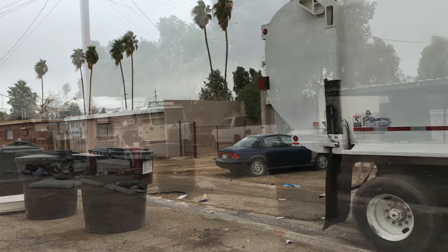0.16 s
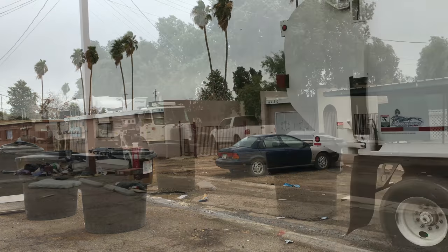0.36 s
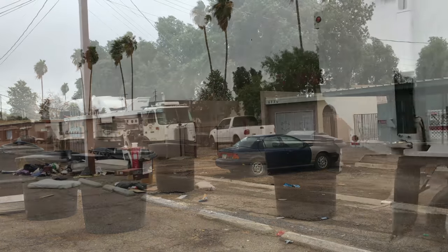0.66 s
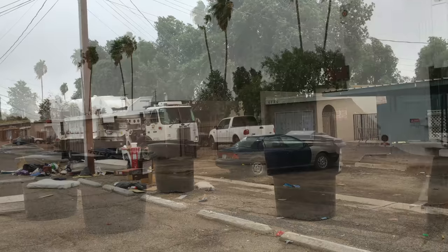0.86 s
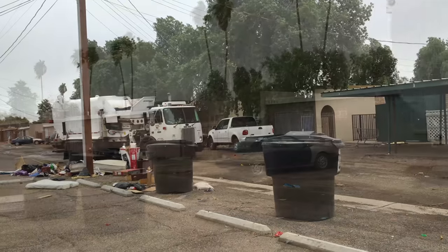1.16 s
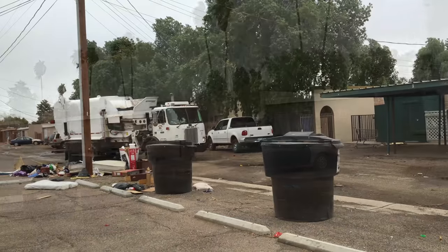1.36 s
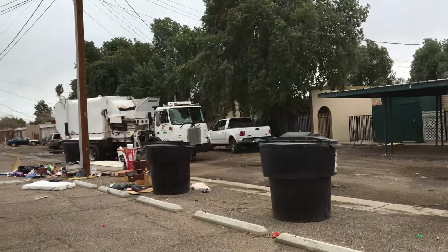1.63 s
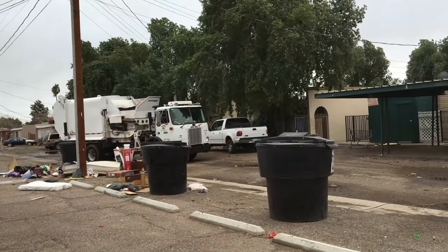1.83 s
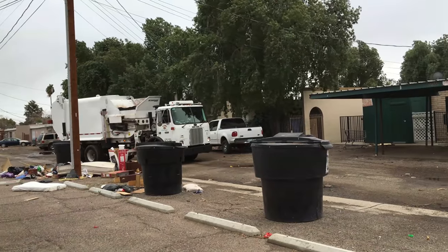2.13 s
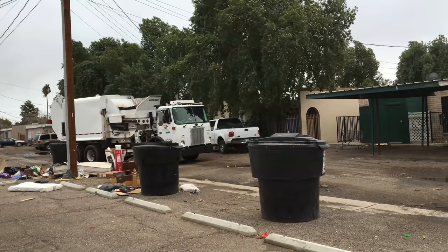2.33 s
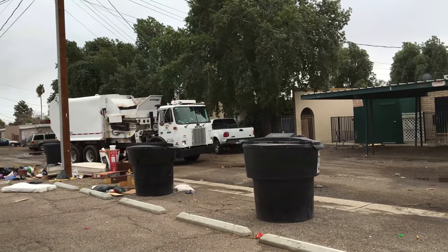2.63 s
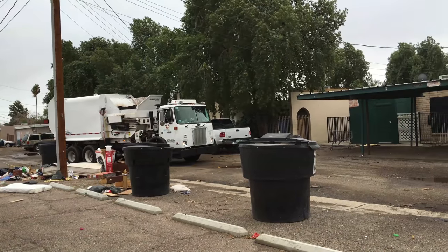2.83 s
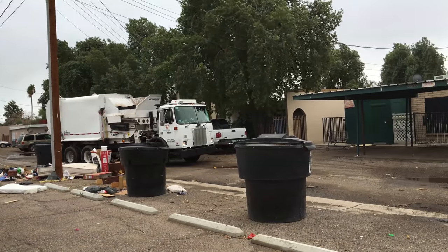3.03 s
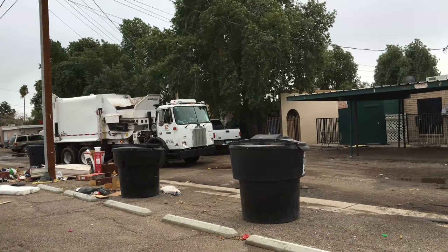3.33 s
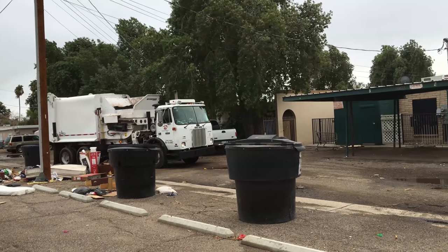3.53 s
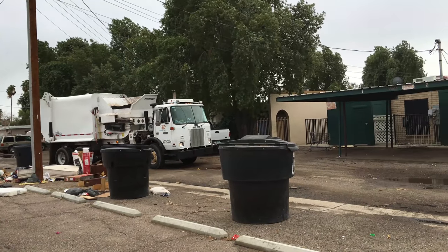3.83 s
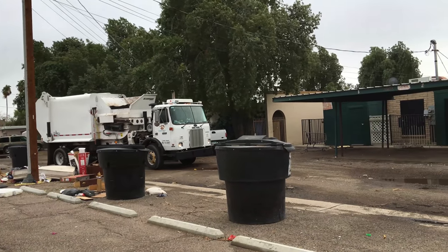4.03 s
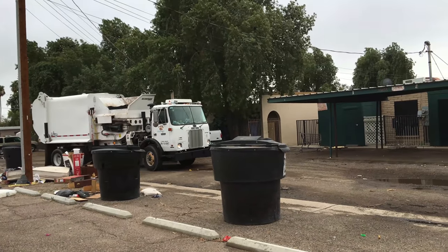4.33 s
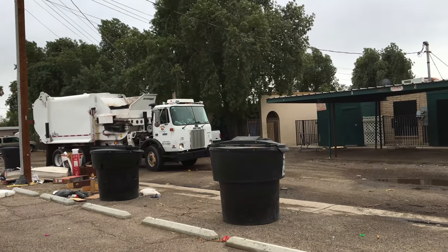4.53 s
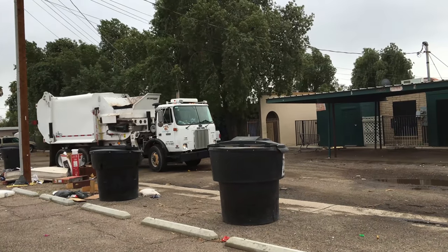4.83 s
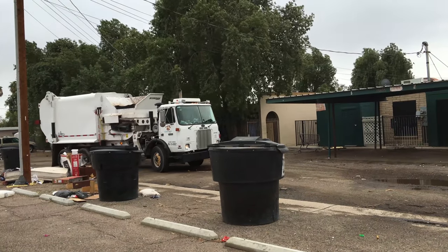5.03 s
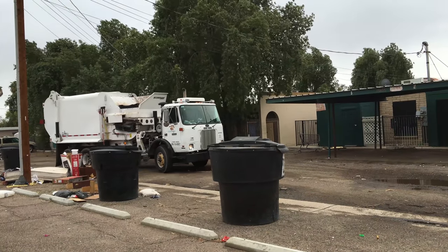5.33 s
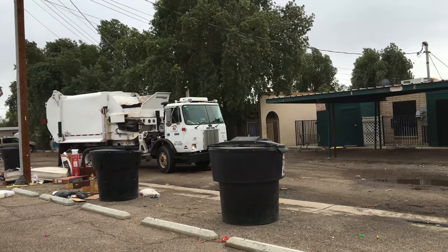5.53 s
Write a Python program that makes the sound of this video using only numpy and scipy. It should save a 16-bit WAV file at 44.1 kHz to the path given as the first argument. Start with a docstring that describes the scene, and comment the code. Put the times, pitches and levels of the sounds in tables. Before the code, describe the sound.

Close, low diesel throb with whirring machinery rises in pitch for under a second, then gives way to the same kind of truck farther across an open yard. Strong gusts thump and crackle on the unprotected microphone almost throughout. A hiss of brake air comes early, a wavering high squeal past the middle, and a sudden close engine swell at the end.

```python
"""Refuse truck with squealing brakes in wind

A diesel refuse truck pulls away close by and fades to a view of it farther off, creeping along a yard;
the close sound swells back at the end. Engines are low sine orders over patchy coloured noise; pump,
gears, turbocharger and brake squeaks are trembling near-sines. The main brake squeal is a stack of
overtones in bouts, brake air is decaying noise, and gusts are noise swells and pops at the microphone."""
import sys
import numpy as np
from scipy import signal
from scipy.fft import rfft, irfft
from scipy.io import wavfile
from scipy.ndimage import uniform_filter1d, minimum_filter1d

SR = 44100
rng = np.random.default_rng(int(sys.argv[2]) if len(sys.argv) > 2 else 0)


def wav_record(signal):
    """Record a signal, one row per channel, as 16-bit PCM in the file named by sys.argv[1]."""
    frames = np.transpose(np.atleast_2d(signal))
    bounded = np.clip(frames, -1, 1)
    # unit amplitude maps onto the largest positive 16-bit level
    quanta = np.round(bounded * 32767).astype(np.int16)
    wavfile.write(sys.argv[1], SR, quanta)


def convert_level_to_amplitude(level_db):
    """Map a level in decibels to its linear amplitude factor."""
    exponent = np.asarray(level_db, float) / 20
    return 10 ** exponent


N = 250929

# Gusts on the microphone: middle_s, width_s (between half-amplitude points), buffeting_db, eddies_db
GUST_ROWS = [(.62, 0.037, -16, -27), (.743, 0.12, -15, -19), (.973, 0.17, -13, -17),
             (1.053, 0.038, -8.5, -15), (1.143, 0.13, -16, -15), (1.291, 0.14, -11.5, -17.5),
             (1.419, 0.061, -17, -16), (1.501, 0.088, -14, -18.5), (1.611, 0.1, -13, -14.5),
             (1.768, 0.16, -16.5, -20), (1.855, 0.052, -11, -25), (1.938, 0.15, -13, -12.5),
             (2.044, 0.056, -15, -11.5), (2.14, 0.029, -21, -22.5), (2.226, 0.15, -18, -21.5),
             (2.37, 0.052, -35, -13.5), (2.457, 0.15, -14, -22), (2.552, 0.071, -14.5, -14.5),
             (2.706, 0.088, -12.5, -24), (2.838, 0.051, -7, -14.5), (2.95, 0.055, -12, -22.5),
             (3.091, 0.13, -16.5, -20.5), (3.179, 0.085, -9.5, -19), (3.326, 0.079, -16, -15.5),
             (3.387, 0.055, -18, -9), (3.452, 0.025, -12, -16.5), (3.58, 0.12, -23, -43),
             (4.016, 0.1, -16, -23.5), (4.136, 0.1, -18, -8), (4.235, 0.11, -16, -11.5),
             (4.429, 0.099, -18.5, -12), (4.522, 0.063, -12, -16.5), (4.66, 0.02, -28, -17.5),
             (4.834, 0.05, -17, -47), (4.995, 0.059, -13.5, -17), (5.063, 0.03, -18, -15),
             (5.113, 0.034, -13.5, -16), (5.17, 0.035, -15.5, -23), (5.27, 0.057, -23, -25)]


def evened(x):
    """Scales to rms 1."""
    return x / np.sqrt(np.mean(x ** 2) + 1e-20)


def read(points, hz):
    """Reads a spectrum on a log-frequency axis."""
    f, value = np.transpose(points)
    return np.interp(np.log(hz + 1), np.log(f + 1), value)


def add(mix, s, sound):
    """Mixes a sound in at time s, cut off where the mix ends."""
    part = mix[round(s * SR):][:len(sound)]
    part += sound[:len(part)]


def coloured(points, count):
    """Noise of rms 1 with the given spectrum."""
    hz = np.fft.rfftfreq(count, 1 / SR)
    spectrum = rfft(rng.standard_normal(count)) * convert_level_to_amplitude(read(points, hz))
    return evened(irfft(spectrum, count))


def wander(count, seconds):
    """Smooth chance of rms 1."""
    size = max(int(seconds * SR), 2)
    smooth = uniform_filter1d(rng.standard_normal(count), size)
    return evened(uniform_filter1d(smooth, size))


def follow(rows):
    """Joins a table's rows sample by sample."""
    s, *columns = np.transpose(rows)
    t = np.arange(s[0], s[-1], 1 / SR)
    return s[0], [np.interp(t, s, c) for c in columns]


def bouts(t, middle, width, db, edge=2):
    """Sums bell-shaped swells, squarer for a larger edge, by power; returns a gain."""
    distance = abs(2 * (t - np.c_[middle]) / np.c_[width])
    bells = np.exp(-np.log(4) * distance ** edge)
    return np.sqrt(convert_level_to_amplitude(db) ** 2 @ bells)


def whine(hz, db, waver, flutter_db, seconds):
    """A near-sine whose pitch and level tremble; it sets in quickly and sinks towards its end."""
    count = len(hz)
    u = np.linspace(0, 1, count)
    turn = 2 * np.pi * np.cumsum(hz * (1 + waver * wander(count, seconds))) / SR
    level = convert_level_to_amplitude(db - 6 * u ** 2 + flutter_db * wander(count, seconds))
    level *= signal.windows.tukey(count, .08)
    onset = np.minimum(np.arange(count) / (0.023 * SR) + 0.28, 1)
    return np.sqrt(2) * level * onset * np.sin(turn)


def glides(rows, waver, flutter_db, seconds):
    """Lays out whines that each slide straight from one pitch to another."""
    track = np.zeros(N)
    for s, length, from_hz, to_hz, db in rows:
        hz = np.linspace(from_hz, to_hz, int(length * SR))
        add(track, s, whine(hz, db, waver, flutter_db, seconds))
    return track


def wind(gust_db, breeze_db, colour, span, lumps_db, seconds):
    """Pressure swings whose strength over a span follows the gusts, with short lumps on top."""
    t = np.arange(0, N / SR + .01, .002)
    middle, width = np.transpose(GUST_ROWS)[:2]
    lull = bouts(t, [2.63], [.06], np.zeros(1), 4)  # the breeze drops for a moment
    breeze = convert_level_to_amplitude(breeze_db) * np.clip((t - 0.28) / 0.21, 0, 1) * (1 - lull)
    gusts = bouts(t, middle, width, gust_db, 2.65)
    strength = np.interp(np.arange(N) / SR, t, np.hypot(gusts, breeze))
    swings = coloured(colour, N) * convert_level_to_amplitude(lumps_db * wander(N, seconds))
    window = signal.windows.hann(int(span * SR)) / (span * SR / 2)
    local_power = signal.oaconvolve(swings ** 2, window, "same")
    return strength * swings / np.sqrt(local_power + 0.0064)


def buffeting():
    """Slow pressure swings push the microphone with each gust."""
    # Colour of the low rumble: pitch_hz, relative_db (per Hz)
    rumble = [(20, -44.5), (35, -54), (50, 3), (90, 6), (150, -2.5), (220, -11), (400, -33.5), (2000, -110)]
    return wind(np.transpose(GUST_ROWS)[2], -23, rumble, 0.12, 1.0, 0.012)


def eddies():
    """Small fast eddies make a lumpier, higher rumble."""
    # Colour of the eddies: pitch_hz, relative_db (per Hz)
    flurry = [(60, -31), (150, 2.5), (250, -1), (450, -10.5), (800, -20.5), (1300, -34.5), (2500, -38),
              (6000, -110)]
    return wind(np.transpose(GUST_ROWS)[3], -40, flurry, 0.047, 5.0, 0.009)


def crackle():
    """Crackle grows faster than the eddies, so only strong ones crackle."""
    # Colour of the crackle: pitch_hz, relative_db (per Hz)
    crackle_colour = [(250, -21), (500, 2.5), (900, -11.5), (1500, -20.5), (3000, -83)]
    gust_db = -4.5 + 1.42 * np.transpose(GUST_ROWS)[3]
    return wind(gust_db, -64, crackle_colour, 0.063, 5.7, 0.004)


def pop(db, hz):
    """A couple of swings of pressure, sharp at the front and falling in pitch towards hz."""
    t = np.arange(4096) / SR
    turns = hz * t + 0.68 * (1 - np.exp(-t * hz / 0.37))
    envelope = (1 - np.exp(-t / 0.00061)) * np.exp(-t * hz / 1.85)
    return convert_level_to_amplitude(db) * np.sin(2 * np.pi * turns) * envelope


def port_pops():
    """Sharp pops where an eddy bursts on the microphone port."""
    # Bursting eddies: start_s, level_db (before rise and decay), pitch_hz (settled)
    bursts = [(0.743, -7.5, 516), (1.128, -8, 596), (1.148, -5, 710), (1.173, -5, 457), (1.262, -5, 486),
              (1.268, -5.5, 130), (1.318, -9, 151), (1.497, -9, 485), (1.539, -11.5, 700),
              (1.619, -5.5, 515), (1.653, -2.5, 420), (1.937, -4, 600), (1.989, -7.5, 595),
              (2.204, -2.5, 665), (2.212, -4, 140), (2.38, -11, 516), (3.337, -3, 231), (4.016, -4.5, 297),
              (4.226, -1, 650), (4.402, -6.5, 621), (5.107, -7, 490)]
    track = np.zeros(N)
    for s, db, hz in bursts:
        add(track, s, pop(db, hz))
    return track


def far_engine():
    """Low orders of an uneven idle that takes over as the near engine fades."""
    # Orders of the idle: multiple, level_db
    orders = [(1, -30), (2, -34)]
    turn = 2 * np.pi * np.cumsum(42.73 * (1 + 0.034 * wander(N, 0.15))) / SR  # 42.73 Hz idle
    hum = sum(convert_level_to_amplitude(db + 4.7 * wander(N, 0.029)) * np.cos(k * turn) for k, db in orders)
    return np.sqrt(2) * hum * np.clip((np.arange(N) / SR - .6) / 1.0, 0, 1)


def roar():
    """Patchy noise of engine clatter, fan and tyres; near colour melts to far and turns back at the end."""
    # Loudness of the roar: time_s, level_db, treble_tilt_db_per_octave (above 1 kHz)
    course = [(0.0, -19.5, 1.55), (0.65, -22.5, 1), (1.38, -31.5, 0.9), (3.36, -27, 0.03), (3.71, -26, 1),
              (3.96, -24.5, 0), (4.26, -28, -0.1), (5.47, -24, 0.6), (5.69, -20.5, 0)]
    # Colour of the truck close by: pitch_hz, relative_db (per Hz)
    near_colour = [(71, -15), (120, 7), (141, -3), (481, -13.5), (1110, -14.5), (2270, -17.5),
                   (2900, -23.5), (4620, -22.5), (4900, -30.5), (7580, -34.5), (10300, -38.5),
                   (10900, -43.5), (15800, -50)]
    # Colour of the truck across the yard: pitch_hz, relative_db (per Hz)
    far_colour = [(120, -26), (200, 3), (400, -10), (650, -3.5), (850, -14.5), (1100, -2.5), (1400, -11.5),
                  (1580, -8.5), (2900, -19), (4100, -17.5), (5100, -29.5), (6000, -26), (15800, -47.5)]
    frames, hz = N // 128 + 5, np.fft.rfftfreq(512, 1 / SR)
    a, b, patches = rng.standard_normal((frames, 257, 3)).T
    patches = evened(uniform_filter1d(uniform_filter1d(patches, 8, 0), 16, 1))
    s, db, tilt_db = np.transpose(course)
    t = np.arange(frames) * 128 / SR
    far = np.clip(np.minimum((t - .3) / 1.2, (5.75 - t) / 0.18), 0, 1)
    field = np.outer(read(near_colour, hz), 1 - far) + np.outer(read(far_colour, hz), far)
    field += np.outer(np.log2(np.maximum(hz, 1000) / 1000), np.interp(t, s, tilt_db))
    field -= 10 * np.log10(convert_level_to_amplitude(2 * field).sum(0))  # colour only, the level follows below
    spectra = (a + 1j * b) * convert_level_to_amplitude(field + 1.25 * patches)
    noise = evened(signal.istft(spectra, nperseg=512, noverlap=384)[1][:N])
    return noise * convert_level_to_amplitude(np.interp(np.arange(N) / SR, s, db) + 0.89 * wander(N, 0.0038))


def body_rings():
    """Narrow fuzzy bands of bodywork ringing with the engine."""
    # Ringing panels: start_s, length_s, from_hz, to_hz, level_db
    panels = [(0, 0.37, 4560, 4510, -39), (0, 0.36, 1135, 1146, -31), (3.9, 2.7, 1084, 1113, -42),
              (4.4, 1.3, 2340, 2334, -45.5)]
    return glides(panels, .012, 3.5, .004)


def turbo_whistle():
    """Breathy whistle of the turbocharger, its pitch trembling fast: near, far, near again."""
    # Whistles: start_s, length_s, from_hz, to_hz, level_db
    breaths = [(0, .8, 6130, 6790, -42), (1.8, 1.9, 6630, 5980, -57.5), (3.3, 4, 5940, 5780, -51.5),
               (5.59, .3, 6250, 6300, -44)]
    return glides(breaths, .0177, 4.4, .00177)


def gear_whine():
    """Gear whines beside those of the pump, steady or sliding slightly."""
    # Gear tones: start_s, length_s, from_hz, to_hz, level_db
    gears = [(0, 0.39, 1065, 1062, -31), (0.5, 0.063, 4500, 4470, -33), (.62, 0.145, 3200, 3270, -38.5),
             (4.6, .9, 4140, 4115, -45), (2.5, 1.8, 1625, 1584, -41)]
    return glides(gears, .002, 2.2, .015)


def firing_hz():
    """Near engine speed, sample by sample."""
    # Speed of the near engine: time_s, firing_rate_hz
    speed = [(0, 45.7), (.35, 46), (.42, 46.5), (.53, 50.3), (.69, 53.2), (.9, 55.3), (1.12, 56.2),
             (1.45, 54.7), (5.5, 48), (5.655, 52)]
    return np.interp(np.arange(N) / SR, *np.transpose(speed))


def pump_whine():
    """Overtones of the engine-driven pump come and go, locked to the firing rate."""
    # Pump overtones: start_s, length_s, multiple (of the pump tone), level_db
    pump_tones = [(0.345, 0.25, 2, -29.5), (.56, 0.65, 2, -34), (0.13, 0.3, 3, -28), (0.6, 0.15, 3, -31),
                  (0.75, 0.275, 3, -33.5), (1.06, 0.3, 3, -35.5), (0.056, 0.36, 4, -35),
                  (0.863, 0.19, 6, -41)]
    pump_hz = 12.4 * firing_hz()
    track = np.zeros(N)
    for s, length, multiple, db in pump_tones:
        hz = multiple * pump_hz[round(s * SR):round((s + length) * SR)]
        add(track, s, whine(hz, db, .004, 2.6, .015))
    return track


def near_engine():
    """Exhaust beats: a deep dip at each firing, a flat crest between."""
    # Load, fading away and swelling back at the end: time_s, firing_tone_db, second_order_db
    load = [(0, -14, -23.5), (.43, -15, -18.5), (.6, -17, -22.5), (.82, -16.5, -30), (.9, -32, -37),
            (.93, -70, -70), (5.48, -70, -70), (5.52, -20, -45), (5.6, -19, -40), (5.655, -4, -36),
            (5.69, -16, -38)]
    s, (first_db, second_db) = follow(load)
    hz = firing_hz()[:len(first_db)]
    turn = 2 * np.pi * np.cumsum(hz * (1 + 0.02 * wander(len(hz), 0.031))) / SR
    beat = convert_level_to_amplitude(first_db) * np.cos(turn) + convert_level_to_amplitude(second_db) * np.cos(2 * turn - .3)
    return s, -np.sqrt(2) * beat


def clack(length, db):
    """A small metal valve chatters on its seat: dense knocks into its modes."""
    # Modes of the valve: pitch_hz, relative_db, t60_s
    modes = [(2400, 1, .006), (3300, 2, 0.014), (4100, -3, .005), (1200, -2, 0.008)]
    t = np.arange(2000) / SR
    ring = sum(convert_level_to_amplitude(mode_db - 60 * t / t60) * np.sin(2 * np.pi * hz * t) for hz, mode_db, t60 in modes)
    chatter = np.convolve(rng.standard_normal(2000) * (t < length), ring)
    return convert_level_to_amplitude(db) * chatter / np.sqrt(np.sum(chatter ** 2) / (length * SR))


def valve_clacks():
    """A valve snaps over."""
    # Snaps: start_s, length_s, level_db
    snaps = [(5.4705, .016, -21)]
    track = np.zeros(N)
    for s, length, db in snaps:
        add(track, s, clack(length, db))
    return track


def puff(db, rise, t60, tilt_db):
    """A valve lets out air: quick rise, hissing fall."""
    # Colour of escaping air before the tilt: pitch_hz, relative_db (per Hz)
    air_colour = [(700, -4), (1800, 6.5), (3200, -6), (4400, -6), (5100, -12), (6300, -10), (8800, -14),
                  (10000, -22.5), (15000, -36)]
    t = np.arange(SR // 2) / SR
    colour = [(hz, level + tilt_db * np.log2(hz / 1000)) for hz, level in air_colour]
    return convert_level_to_amplitude(db - 60 * t / t60) * (1 - np.exp(-t / rise)) * coloured(colour, len(t))


def brake_air():
    """Puffs of air from the brakes."""
    # Puffs: start_s, level_db, rise_s, t60_s, brightness_db_per_octave
    releases = [(1.49, -40, .01, 0.8, 5), (1.648, -26.5, 0.007, 1, 0.1), (5.426, -31, .001, 0.1, 5),
                (5.472, -22, .003, 0.2, 1.5)]
    track = np.zeros(N)
    for s, *row in releases:
        add(track, s, puff(*row))
    return track


def shoe_squeaks():
    """Thin high squeaks of brake shoes, each a trembling near-sine."""
    # Squeaks: start_s, length_s, from_hz, to_hz, level_db
    squeak_rows = [(0, 0.19, 10180, 10260, -31.5), (.17, 0.23, 10200, 10100, -31.5),
                   (0, 0.32, 9500, 9600, -44), (.28, 0.093, 8080, 7880, -38), (.5, 0.22, 7850, 7950, -43),
                   (.87, 0.13, 9160, 9280, -34), (.97, 0.19, 9270, 9300, -44.5),
                   (.93, 0.27, 7860, 8230, -44), (1.15, 0.15, 8370, 8600, -49.5),
                   (1.42, 0.52, 8180, 8470, -55), (1.9, 0.33, 8270, 8500, -53),
                   (2.39, 0.32, 14920, 15000, -47), (2.65, 0.5, 14980, 14700, -45.5),
                   (3.04, 0.46, 14700, 15050, -48), (3.35, .16, 14440, 14050, -56),
                   (4.25, .82, 15450, 15250, -57), (5.25, .4, 15150, 14970, -59),
                   (5.6, .2, 14980, 14480, -50)]
    return glides(squeak_rows, .002, 3.2, .008)


def squeal():
    """Stick-slip of a shoe on its drum: overtones over a rubbing hiss, sagging as the wheels slow."""
    # Bouts in which the shoe grabs the drum: middle_s, width_s, level_db
    grabs = [(3.517, 0.11, -13), (3.6, 0.076, -21.5), (3.66, 0.057, -19.5), (3.743, 0.038, -15.5),
             (3.85, 0.11, -16), (3.93, 0.035, -16), (3.985, 0.03, -15.5), (4.07, 0.13, -20.5)]
    # Upper overtones: multiple, relative_db (to the upper level)
    overtones = [(3, 6), (4, 2), (5, -3), (6, 0.5), (7, -2), (8, -5.5), (10, -13), (11, -11), (13, -17)]
    # Colour of the rubbing: pitch_hz, relative_db (per Hz)
    rubbing = [(2000, -23), (5000, -3), (10000, -1), (15500, -6)]
    squeal_hz, sag_hz, sag_s = 1172, 82, .125
    t = np.arange(3.42, 4.168, 1 / SR)
    count = len(t)
    slowing = np.maximum(t - 3.885, 0)  # seconds since the wheels began to slow
    hz = squeal_hz - sag_hz * (1 - np.exp(-slowing / sag_s))
    turn = 2 * np.pi * np.cumsum(hz * (1 + 0.003 * wander(count, 0.0097))) / SR
    rise = np.minimum((t - t[0]) / 0.057, 1)
    upper = convert_level_to_amplitude(-48) * rise
    second_db = -34.5 - 3 * (slowing / sag_s) ** 2 + 3.8 * wander(count, 0.012)
    levels = [(1, bouts(t, *np.transpose(grabs))), (2, rise * convert_level_to_amplitude(second_db))]
    for k, db in overtones:
        loss_db = 12 * k * slowing  # the highest die first
        levels.append((k, upper * convert_level_to_amplitude(db - loss_db + 3.7 * wander(count, 0.011))))
    stack = sum(gain * convert_level_to_amplitude(1.5 * wander(count, 0.0067)) * np.sin(k * turn) for k, gain in levels)
    hiss = upper * convert_level_to_amplitude(-0.5 - 76 * slowing) * coloured(rubbing, count)
    return t[0], (np.sqrt(2) * stack + hiss) * signal.windows.tukey(count, .05)


def scene():
    """Mixes wind, truck and brakes into one channel."""
    mix = buffeting() + eddies() + crackle() + port_pops()
    mix += far_engine() + roar() + body_rings()
    mix += turbo_whistle() + gear_whine() + pump_whine()
    add(mix, *near_engine())
    mix += valve_clacks() + brake_air() + shoe_squeaks()
    add(mix, *squeal())
    return mix[None]


def roll_off(x):
    """The treble ends steeply here."""
    return signal.sosfilt(signal.butter(12, 15960, fs=SR, output="sos"), x)


def record(dry):
    """A fast limiter holds the loudest gusts at full scale."""
    room = minimum_filter1d(1 / np.maximum(abs(dry), 1), size=89, axis=1)
    limited = dry * uniform_filter1d(room, size=45, axis=1)
    return roll_off(limited)


dry = scene()
out = record(dry)
wav_record(out)
```